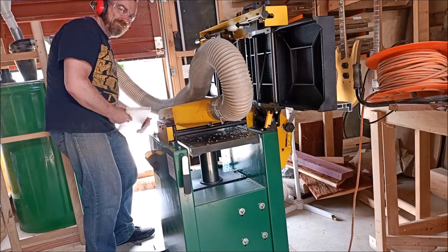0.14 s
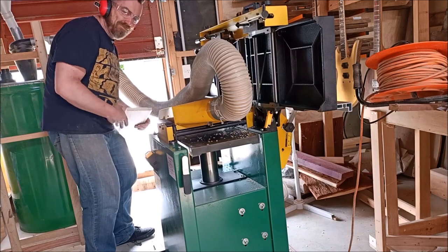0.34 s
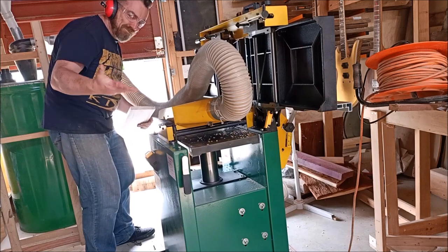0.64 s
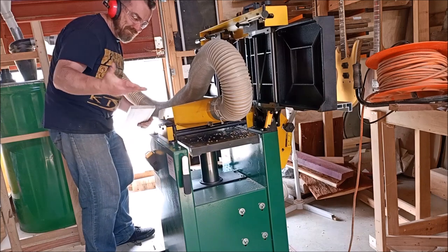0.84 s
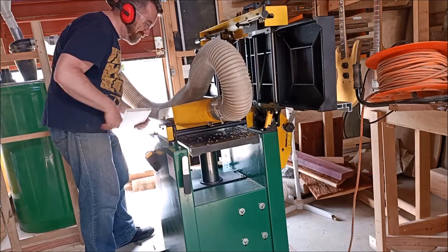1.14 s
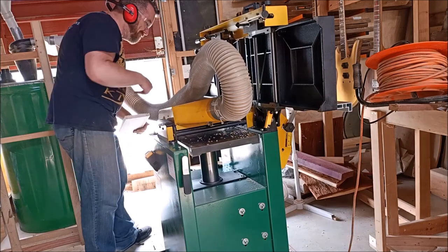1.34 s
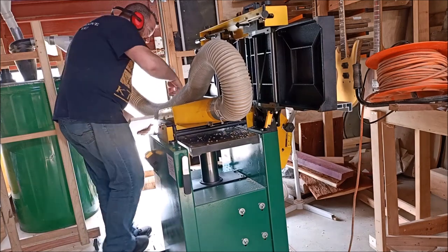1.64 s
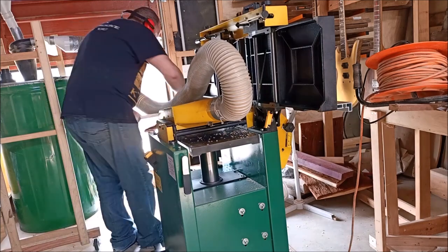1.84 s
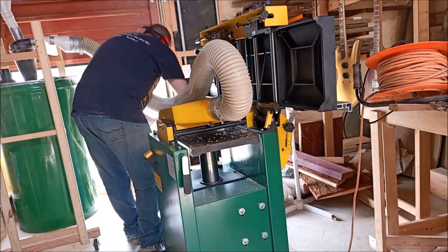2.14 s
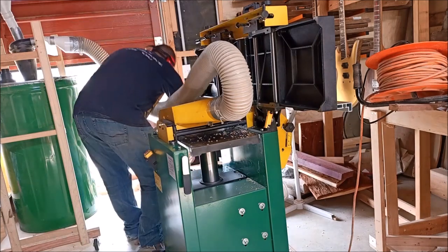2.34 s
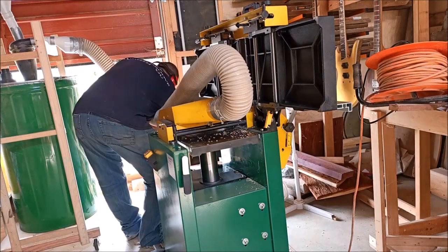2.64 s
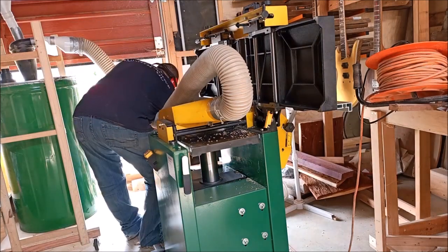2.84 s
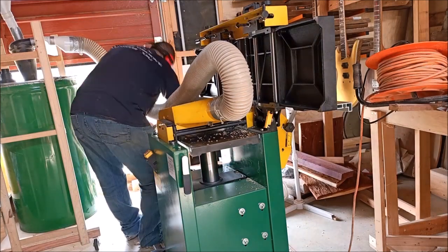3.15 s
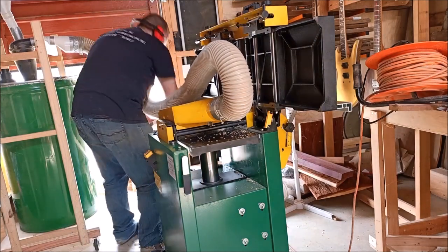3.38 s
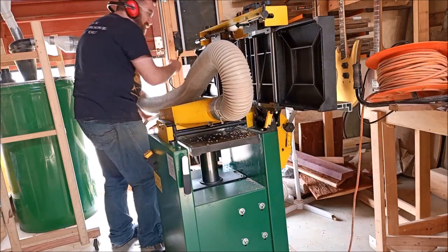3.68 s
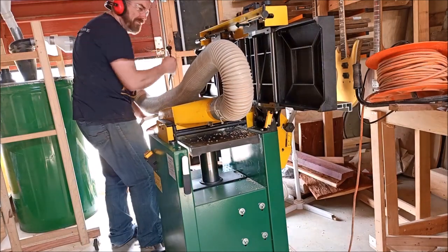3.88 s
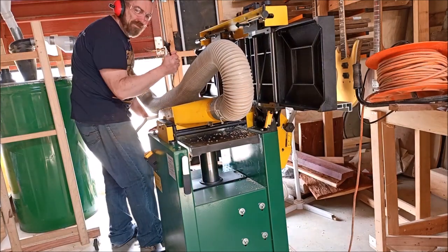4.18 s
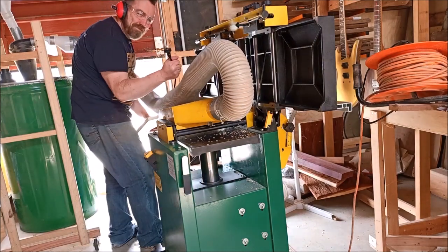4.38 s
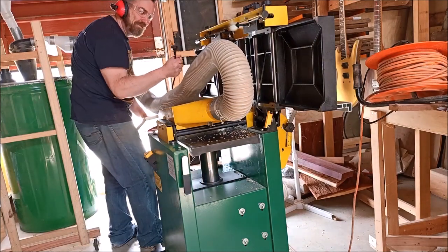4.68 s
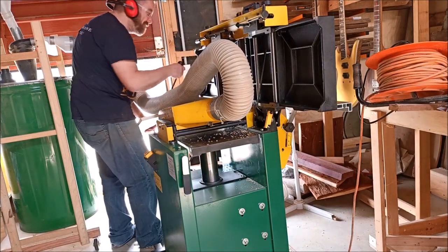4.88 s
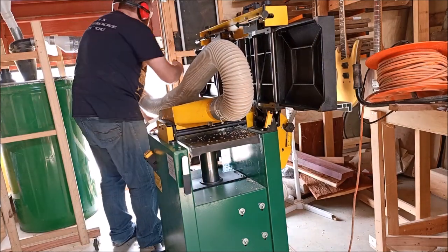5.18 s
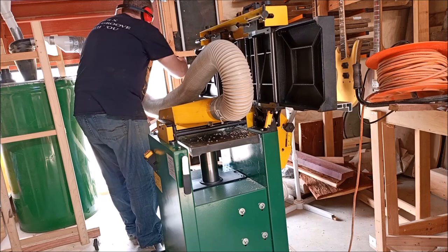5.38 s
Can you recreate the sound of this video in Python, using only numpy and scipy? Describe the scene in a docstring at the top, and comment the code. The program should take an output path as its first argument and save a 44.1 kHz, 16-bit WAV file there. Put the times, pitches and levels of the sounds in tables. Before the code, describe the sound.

A dust extractor runs steadily in a workshop, its motor whining and fan whistling over hissing air, with a brief, soft wood scrape.

```python
"""A dust extractor runs beside a wood planer in a workshop. Its fast mains motor sings at the rate the
shaft turns, and its nine-bladed fan whistles; the tones swell and fade as someone moves about in front.
Sucked-in air drones hollowly in the hose and hisses through the planer's hood, making its panels ring.
About three seconds in, wood scrapes softly on the table that feeds the planer."""
import sys
import numpy as np
from scipy import signal
from scipy.fft import rfft, irfft, next_fast_len
from scipy.io import wavfile
from scipy.ndimage import map_coordinates

SR = 44100
rng = np.random.default_rng(int(sys.argv[2]) if len(sys.argv) > 2 else 0)


def wav_record(signal):
    """Record a signal, one row per channel, as 16-bit PCM in the file named by sys.argv[1]."""
    frames = np.transpose(np.atleast_2d(signal))
    bounded = np.clip(frames, -1, 1)
    # unit amplitude maps onto the largest positive 16-bit level
    quanta = np.round(bounded * 32767).astype(np.int16)
    wavfile.write(sys.argv[1], SR, quanta)


N = 243431
TIME_S = np.arange(N) / SR
HISS_DB, HISS_LEAN_DB = -38.5, -2.5  # the hood's hiss with the worker upright; change at full lean


def amp(db):
    """Turn decibels into a number to multiply by."""
    return 10 ** (np.asarray(db) / 20)


def unit(x):
    """Scale x to an average strength (rms) of 1."""
    return x / np.sqrt(np.mean(x ** 2) + 1e-20)


def curve(points):
    """Join (time_s, value) points with straight lines, one value per sample."""
    times, values = np.transpose(points)
    return np.interp(TIME_S, times, values)


def wobble(rate):
    """A smooth random curve of strength 1, through `rate` random points a second."""
    points = rng.standard_normal(int(N * rate / SR) + 4)
    return unit(map_coordinates(points, [TIME_S * rate]))


def filtered(x, gain_at):
    """Multiply each frequency in x by gain_at(hz)."""
    size = next_fast_len(N + SR // 2)
    hz = np.fft.rfftfreq(size, 1 / SR)
    return irfft(rfft(x, size) * gain_at(hz), size)[:N]


def shaped_noise(colour):
    """Noise of strength 1, its lows and highs set by (pitch_hz, relative_db) points."""
    hz, db = np.transpose(colour)
    noise = rng.standard_normal(N)
    return unit(filtered(noise, lambda f: amp(np.interp(np.log(f + 1), np.log(hz), db))))


def resonance(pitch_hz, half_width_hz):
    """Noise of strength 1 that rings around one pitch."""
    noise = rng.standard_normal(N)
    return unit(filtered(noise, lambda f: 1 / (1 + ((f - pitch_hz) / half_width_hz) ** 2)))


def resonances(rows):
    """Noise of strength 1 that rings around several pitches; wider ones get more weight."""
    return unit(sum(amp(db) * np.sqrt(width) * resonance(hz, width) for hz, width, db in rows))


def leaning_level(upright_db, lean_db):
    """A level in dB that shifts as the worker leans over the planer and shields the hood."""
    # the worker's posture: time_s, lean (0 upright, 1 bent over)
    lean = [(0, 0.11), (1.5, .12), (1.85, .9), (2.3, 0.93), (3.15, .65), (3.95, 0.95), (4.4, .35),
            (4.8, .35), (5.25, 0.9), (5.52, .8)]
    return upright_db + lean_db * curve(lean)


def motor_and_fan(shaft_hz=522.6, blades=9, mains_hz=50):
    """Shaft and fan sing at multiples of the turning rate; moving air makes each tone flutter."""
    # the tone an octave above the shaft's: time_s, level_db
    octave_levels = [(0, -46.5), (1.4, -46.5), (1.9, -48.5), (2.6, -48), (3.0, -50), (3.7, -49.5),
                     (4.0, -51.5), (4.6, -47.5), (5.25, -51.5)]
    # the fan's whistle, which dips as the worker moves about: time_s, level_db
    whistle_levels = [(0, -40.2), (1.2, -38.9), (2.1, -40.5), (2.35, -41.5), (2.9, -39.6), (3.33, -40.2),
                      (3.45, -45), (4.05, -48.4), (4.21, -45.5), (4.32, -40.3), (4.75, -42.2), (5.0, -40.5),
                      (5.52, -42.5)]
    # the shaft's weaker high tones: multiple, level_db
    overtone_levels = [(4, -58), (5, -58.5), (6, -60), (7, -64), (8, -63), (10, -73), (11, -81.5),
                       (15, -85), (22, -91.5)]
    speed_hz = shaft_hz + 0.07 * wobble(1.5)
    pull = np.sin(2 * np.pi * 2 * mains_hz * TIME_S)  # the motor's pull pulses at twice the mains rate
    angle = 2 * np.pi * np.cumsum(speed_hz) / SR + 0.05 * pull / blades

    def tone(multiple, flutter):
        """A steady direct tone plus a wavering share that bounces round the room."""
        bounced = wobble(14) + 1j * wobble(15) + 0.95 * (wobble(70) + 1j * wobble(70))
        phase = multiple * angle + 2 * np.pi * rng.random()
        return unit(np.real((1 + flutter * bounced) * np.exp(1j * phase)))

    shaft = amp(leaning_level(-28.3, lean_db=2)) * tone(1, flutter=0.015)
    octave = amp(curve(octave_levels)) * tone(2, flutter=0.06)
    third = amp(leaning_level(-48.7, lean_db=-3.8)) * tone(3, flutter=0.1)
    whistle_db = curve(whistle_levels)
    whistle = amp(whistle_db) * tone(blades, flutter=0.064)
    upper_db = -78 - 0.45 * (whistle_db - whistle_db.mean())  # its octave grows as the whistle fades
    whistle += amp(upper_db) * tone(2 * blades, flutter=0.064)
    overtones = sum(amp(db) * tone(round(k), flutter=0.14) for k, db in overtone_levels)
    return shaft + octave + third + (1 + 0.05 * pull) * whistle + overtones


def frame_hum():
    """The motor's frame gives off faint, steady tones."""
    # mains hum and trembling panels: pitch_hz, level_db
    tones = [(100, -66), (423, -67), (630, -68), (764, -68.5), (974, -66.5), (1367, -67.5)]
    return sum(amp(db) * unit(np.sin(2 * np.pi * hz * TIME_S + 0.27 * wobble(5.7))) for hz, db in tones)


def hose_drone(note_hz=217.2, wander_hz=2.2, idle_db=-44.5, throb_db=3, rise_s=0.028, fall_s=0.039):
    """Air blows the hose like a pipe: a weak, throbbing note that swells at times, over a hollow ring."""
    # moments when the note catches and swells: start_s, length_s, level_db
    swells = [(0.01, .055, -35), (0.12, 0.04, -35), (0.313, 0.079, -34.5), (0.48, 0.097, -31.5),
              (0.617, .08, -36), (0.952, 0.14, -36), (1.315, 0.04, -34.5), (1.434, 0.11, -33),
              (1.665, 0.069, -37), (1.955, .08, -36.5), (2.318, 0.11, -33.5), (2.517, 0.034, -37),
              (2.622, 0.05, -35), (2.755, .09, -38), (2.91, 0.036, -36), (3.5, 0.081, -36),
              (3.99, .055, -37), (4.6, 0.32, -37), (4.952, 0.14, -35.5), (5.4, 0.041, -37)]
    # air ringing inside hose, drum and hood: pitch_hz, half_width_hz, relative_db
    hollows = [(105.6, 8, -6), (127, 6.5, -13), (168.8, 7.5, 2), (197, 4.6, 2), (227.7, 10, 1),
               (255, 9, -3.5), (285, 11, 0.5), (530, 56, -11), (952, 11, -13), (1357, 17, -11)]
    strength = amp(idle_db + throb_db * wobble(24))
    for start, length, db in swells:
        rising = (TIME_S - start) / rise_s
        falling = (start + length - TIME_S) / fall_s
        caught = np.clip(np.minimum(rising, falling) + 0.5, 0, 1)
        strength += caught * (amp(db) - strength)
    phase = 2 * np.pi * np.cumsum(note_hz + wander_hz * wobble(25)) / SR
    return strength * unit(np.sin(phase)) + amp(-43) * resonances(hollows)


def hood_ring(below_hiss_db=7.5, flicker_db=1):
    """The hood's thin panels ring in the air stream, harder as the hiss grows."""
    # the panels' notes: pitch_hz, half_width_hz, relative_db
    panels = [(1946, 10, -3), (2015, 20, -3.5), (2127, 10, -3), (2390, 11, 0.5), (2563, 34, 0.5),
              (2692, 18, -0.5), (2857, 35, -4), (3475, 10, -8)]
    level_db = leaning_level(HISS_DB, HISS_LEAN_DB) - below_hiss_db + flicker_db * wobble(12)
    return amp(level_db) * resonances(panels)


def rushing_air(thin_hold_s=0.31, thin_fade_db_per_s=84):
    """Swirling air rushes in the hose, hisses at the hood and sizzles past its edges."""
    # the low rush: pitch_hz, relative_db
    rush_colour = [(20, -32.5), (45, -24), (80, -9.5), (140, -5), (250, -3.5), (350, 3), (560, 0),
                   (700, -2), (1100, -6.5), (1500, -8.5), (2500, -23), (5000, -64)]
    # the hood's hiss: pitch_hz, relative_db
    hiss_colour = [(700, -32.5), (1450, -19.5), (1750, -7.5), (2000, -3), (2650, -0.5), (3050, -4.5),
                   (3900, -9), (4400, -14.5), (4750, -9), (5180, -13.5), (5350, -35.5), (7500, -51),
                   (10000, -72.5)]
    # a narrow band where air sings past edges: pitch_hz, relative_db
    edge_colour = [(5800, -48.5), (6330, -25), (6430, -0.5), (6700, 0), (6800, -7.5), (7050, -8),
                   (7400, -21.5), (8500, -54)]
    # the high sizzle: pitch_hz, relative_db
    sizzle_colour = [(3000, -29), (5000, -2), (5600, -4.5), (5950, -0.5), (7000, 1.5), (7500, -4),
                     (8000, -11.5), (9000, -16), (9800, -22.5), (12000, -28), (14000, -26), (16000, -26.5)]
    # a thin hiss at the start that soon dies away: pitch_hz, relative_db
    thin_colour = [(4000, -69), (5300, -1), (5650, -5), (5900, -0.5), (6300, -0.5), (6700, -25),
                   (8000, -61)]
    hiss_db = leaning_level(HISS_DB, HISS_LEAN_DB)
    thin_db = -54 - thin_fade_db_per_s * np.maximum(TIME_S - thin_hold_s, 0)
    rush = amp(leaning_level(-45, lean_db=-3) + 0.47 * wobble(6)) * shaped_noise(rush_colour)
    hiss = amp(hiss_db + 0.5 * wobble(45)) * shaped_noise(hiss_colour)
    edge = amp(hiss_db - 16 + 0.5 * wobble(35)) * shaped_noise(edge_colour)
    sizzle = amp(leaning_level(-56.5, lean_db=-3.5) + wobble(25)) * shaped_noise(sizzle_colour)
    thin = amp(thin_db) * shaped_noise(thin_colour)
    return rush + hiss + edge + sizzle + thin


def workshop_echo(x, echo_db=-10, fade_s=0.31):
    """Close walls and clutter add a short echo that falls by 60 dB in fade_s."""
    t = np.arange(SR // 3) / SR
    tail = rng.standard_normal(len(t)) * amp(-60 * t / fade_s)
    echo = signal.fftconvolve(x, tail / np.linalg.norm(tail))[:N]
    return (x + amp(echo_db) * echo) / np.hypot(1, amp(echo_db))


def rumble(swell_db=2):
    """A faint, low rumble swells and fades, louder while the worker leans in."""
    level_db = leaning_level(-76, lean_db=7) + swell_db * wobble(3)
    return amp(level_db) * resonance(pitch_hz=59, half_width_hz=8.9)


def faint_hiss(level_db=-82):
    """A very faint, even hiss lies under everything."""
    return amp(level_db) * unit(rng.standard_normal(N))


def wood_scrapes(grain_db=3):
    """Wood slides on the planer's table in short, grainy strokes."""
    # the strokes: middle_s, half_length_s, level_db
    strokes = [(2.8, .06, -50.5), (2.92, 0.058, -46), (3.125, .075, -45), (3.244, .03, -47.5)]
    # the sound of rubbing wood: pitch_hz, relative_db
    scrape_colour = [(60, -42), (150, -19), (350, 0.5), (800, -2), (1400, -4.5), (2200, -3), (4000, -33),
                     (8000, -82)]
    strength = sum(amp(db) * np.exp(-((TIME_S - middle) / half) ** 2) for middle, half, db in strokes)
    grain = amp(grain_db * wobble(120))
    return strength * unit(grain * shaped_noise(scrape_colour))


def scene():
    """Motor, air stream and scrapes, heard in one channel from a few steps away."""
    machines = motor_and_fan() + frame_hum() + hose_drone() + hood_ring()
    air = workshop_echo(rushing_air())
    return (machines + air + rumble() + faint_hiss() + wood_scrapes())[None]


def record(dry, top_hz=15750):
    """Cut away the very highest treble, above top_hz."""
    return np.array([filtered(channel, lambda hz: hz < top_hz) for channel in dry])


dry = scene()
out = record(dry)
wav_record(out)
```